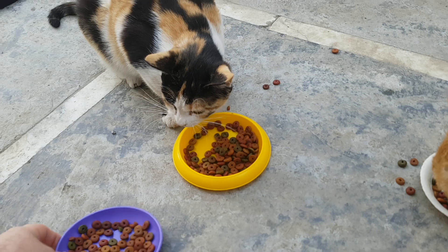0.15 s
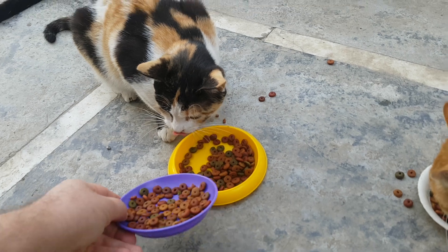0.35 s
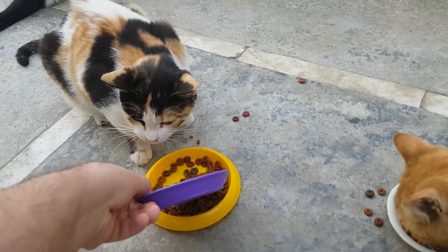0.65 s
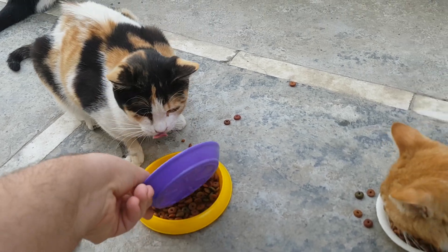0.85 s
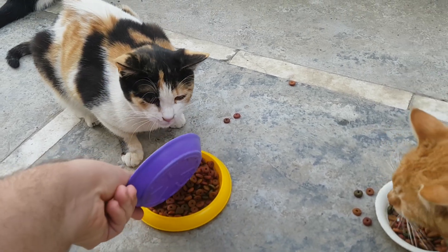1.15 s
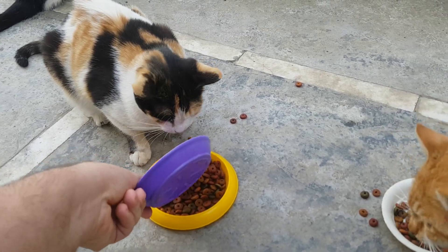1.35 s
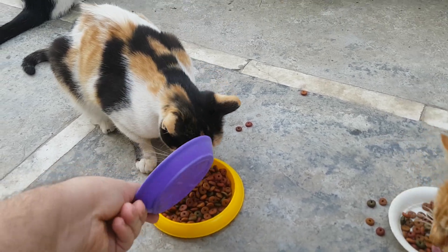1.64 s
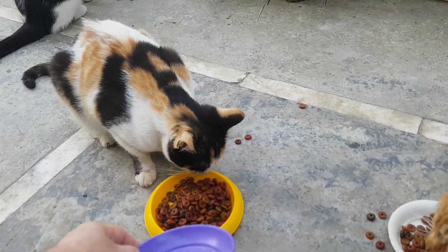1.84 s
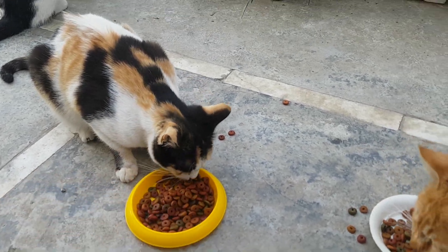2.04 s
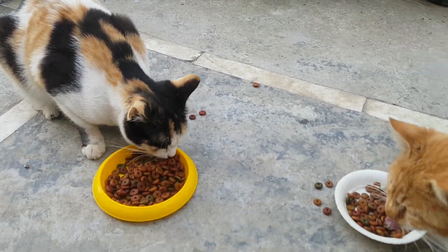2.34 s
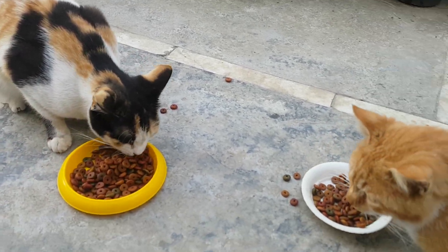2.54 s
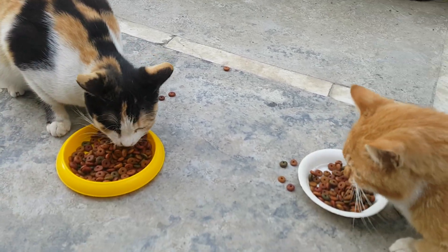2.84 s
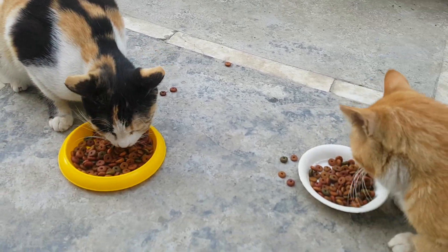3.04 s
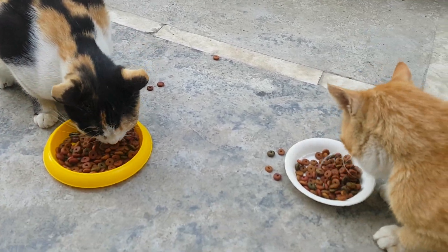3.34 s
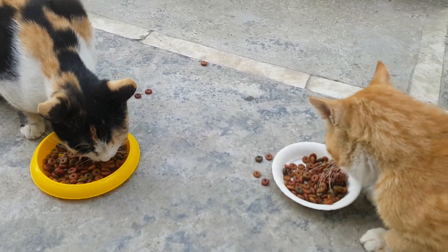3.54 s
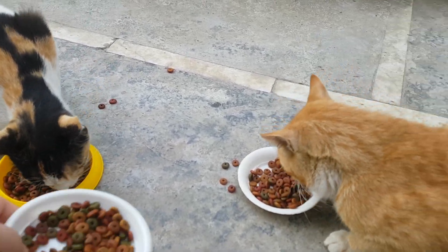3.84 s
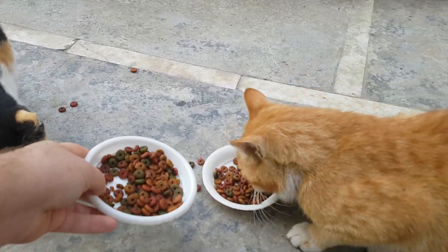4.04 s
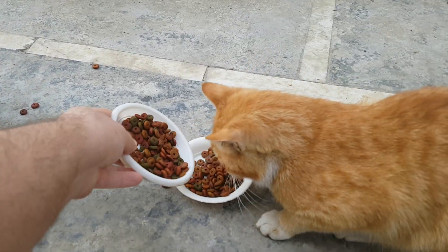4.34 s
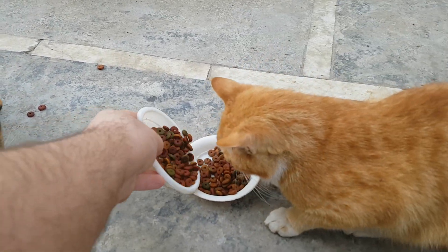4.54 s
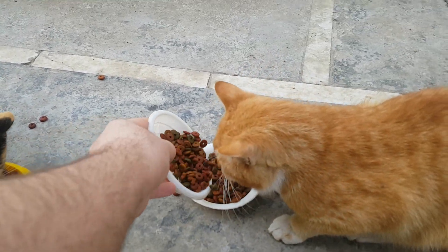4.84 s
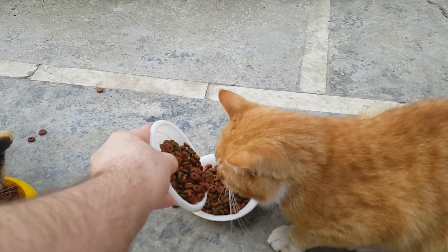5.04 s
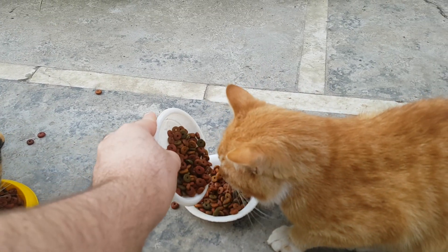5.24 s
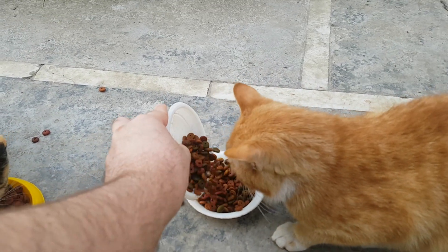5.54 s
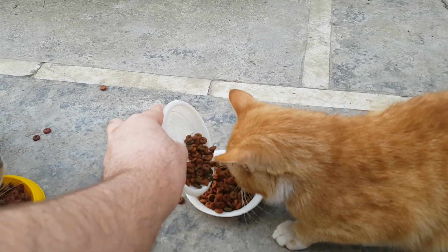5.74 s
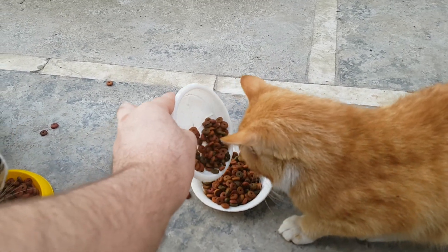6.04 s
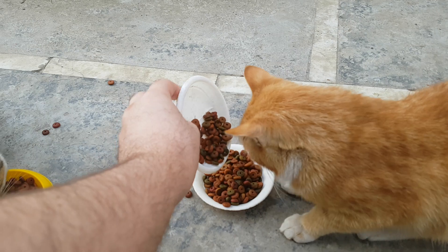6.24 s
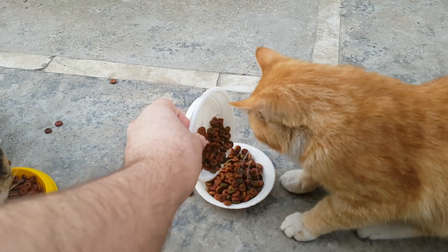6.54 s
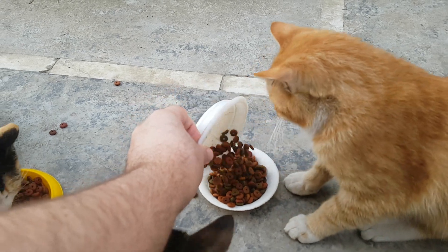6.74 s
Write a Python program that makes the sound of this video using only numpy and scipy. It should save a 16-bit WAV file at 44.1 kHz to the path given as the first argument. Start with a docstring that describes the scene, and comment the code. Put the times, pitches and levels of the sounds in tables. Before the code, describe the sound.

Dry pet food rattles into plastic bowls in two pours, with an empty bowl clattering on concrete and faint cat crunching between them.

```python
"""Dry pet food poured from hand-held plastic bowls into bowls on a concrete yard.
A distant drone and faint hum run throughout; at the start cloth rustles and a cat crunches.
First pour, to 1.4 s: the heap slides, pellets tick on each other and ring the plastic.
At 2.2-2.5 s the emptied bowl bounces on the concrete; then cats crunch and push pellets about.
Second pour, from 4 s: more slides, ticks and rustle; the held bowl bumps the one below."""
import sys
import numpy as np
from scipy import signal
from scipy.io import wavfile

SR = 44100
rng = np.random.default_rng(int(sys.argv[2]) if len(sys.argv) > 2 else 0)


def master_out(mix):
    """Clip the mix to full scale and print it as 16-bit PCM to the path in sys.argv[1]."""
    frames = np.transpose(np.atleast_2d(mix))
    ceiling = np.clip(frames, -1, 1)
    pcm = np.round(ceiling * 32767).astype(np.int16)
    wavfile.write(sys.argv[1], SR, pcm)


N = 303408
SPLIT_S = 2.55   # first pour's bowls before, second's after
FIRST_LEAN_DB, SECOND_LEAN_DB, SET_DOWN_LEAN_DB = 2, 3.5, 3.3   # nominal, right over left


def from_db(db):
    """dB to gain."""
    return 10 ** (np.asarray(db) / 20)


def rms_one(x):
    """Scale to rms 1."""
    return x / np.sqrt(np.mean(x ** 2) + 1e-20)


def in_time(rows):
    """Per-sample gain from (t/s, level/dB) rows."""
    s, db = np.transpose(rows)
    return from_db(np.interp(np.arange(N) / SR, s, db))


def at_hz(points, hz):
    """Look up (f/Hz, value) rows on a log axis."""
    knots_hz, values = np.transpose(points)
    return np.interp(np.log(hz), np.log(knots_hz + 1), values)


def butter(x, order, hz, kind):
    """Causal Butterworth filter."""
    return signal.sosfilt(signal.butter(order, hz, kind, fs=SR, output="sos"), x)


def ring(clicks, hz, t60_s):
    """Resonator: a unit click starts a decaying unit sine."""
    r, w = from_db(-60 / (t60_s * SR)), 2 * np.pi * hz / SR
    return signal.lfilter([0, np.sin(w)], [1, -2 * r * np.cos(w), r * r], clicks + 1e-18)


def drift(rate_hz):
    """Slow random wander, rms 1."""
    r = np.exp(-80 * np.pi * rate_hz / SR)
    slow = signal.lfilter([1], [1, -2 * r, r * r], rng.standard_normal(N // 40 + 2002))[2000:]
    return np.interp(np.arange(N) / 40, np.arange(len(slow)), rms_one(slow))


# left-right likeness of noise: f/Hz, correlation
CORRELATION = [(30, .65), (110, .75), (220, .75), (380, .55), (700, .07), (1290, -.3), (2400, .1),
               (15000, 0)]

def banded_noise(spectrum, flicker_db, correlation_scale):
    """Stereo noise in flickering half-octave bands, rms 1."""
    out, common = 0, drift(2.5)
    edges_hz = 22 * 2 ** np.arange(0, 9.9, .5)
    white = rng.standard_normal((2, 2, N))
    for k, (low, high) in enumerate(zip(edges_hz, edges_hz[1:])):
        if high < spectrum[0][0]:
            continue
        mid, side = butter(white[k % 2], 2, [low, high], "band")
        hz = np.sqrt(low * high)
        alike = np.clip(correlation_scale * at_hz(CORRELATION, hz), -1, 1)
        gain = from_db(at_hz(spectrum, hz) + flicker_db * (.6 * common + drift(12)))
        out = out + gain * (np.sqrt(1 + alike) * mid + np.sqrt(1 - alike) * side * [[1], [-1]])
    return rms_one(out)


# drone spectrum: f/Hz, relative density/dB
DRONE_SPECTRUM = [(12, -29), (20, -15), (49, -10), (104, -5.5), (222, -10.5), (347, -4), (527, -10),
                  (1030, -12), (1330, -15.5), (2200, -17), (3440, -29.5), (7110, -34), (9950, -34.5),
                  (14700, -35.5), (16000, -39)]
# drone envelope: t/s, level/dB
DRONE_LEVELS = [(0, -54), (.3, -55), (.7, -54.5), (1.3, -58), (2.2, -57.5), (3.2, -58.5), (4.2, -58),
                (5, -59), (6, -59.5), (6.88, -60)]

def drone():
    """Distant, low, near-steady noise."""
    return in_time(DRONE_LEVELS) * banded_noise(DRONE_SPECTRUM, flicker_db=.5, correlation_scale=1)


# hum tones: f/Hz, width/Hz, start level/dB, fade/(dB/s)
HUM_TONES = [(87, 14, -76.5, -0.2), (172.9, 5.6, -70.5, 0.85), (344.8, 9.2, -68, 0.1),
             (400.8, 61, -62, 2.5)]

def hum():
    """Narrow wavering tones: noise twice through a resonance."""
    out = 0
    for hz, width_hz, db, fade_db_per_s in HUM_TONES:
        r = np.exp(-np.pi * width_hz / SR)
        poles = [1, -2 * r * np.cos(2 * np.pi * hz / SR), r * r]
        band = signal.lfilter([1, 0, -1], poles, rng.standard_normal(N + SR))
        tone = signal.lfilter([1], poles, band)[SR:]
        out = out + from_db(db - fade_db_per_s * np.arange(N) / SR) * rms_one(tone)
    return out


def yard(x, level_db=-17, t60_s=.09, cutoff_hz=6000):
    """Scatter off ground and walls: a dull noise tail per channel."""
    t = np.arange(SR // 3) / SR
    tail = rng.standard_normal((2, len(t))) * from_db(-60 * t / t60_s) * (t > .002)
    tail = butter(tail, 1, cutoff_hz, "low")
    tail = from_db(level_db) * tail / np.sqrt(np.sum(tail ** 2, axis=1, keepdims=True))
    return signal.fftconvolve(x, tail, axes=1)[:, :N]


# cloth spectrum: f/Hz, relative density/dB
RUSTLE_SPECTRUM = [(700, -19), (1500, -1.5), (3000, -4.5), (5000, -15.5), (8000, -0.5), (9300, -12),
                   (12500, -8), (16000, -25)]
# cloth envelope: t/s, level/dB
RUSTLE_LEVELS = [(0, -52), (.25, -54), (.4, -66.5), (.52, -50.5), (.68, -57.5), (.8, -46), (.95, -96),
                 (1.6, -87), (2.05, -68.5), (2.62, -57.5), (2.72, -74.5), (3.7, -75), (3.85, -61),
                 (4.0, -53.5), (4.15, -59), (5.2, -75), (5.7, -64), (6.0, -98), (6.88, -54)]

def rustle():
    """Nearby cloth: swells of bright noise."""
    return in_time(RUSTLE_LEVELS) * banded_noise(RUSTLE_SPECTRUM, flicker_db=.7, correlation_scale=.3)


# crunch spectrum: f/Hz, relative density/dB
CRUNCH_SPECTRUM = [(900, -59), (2000, 3.5), (3000, -4.5), (5000, -12), (7500, -7), (9500, -16),
                   (13000, -15.5), (16000, -19)]
# cat bites: t/s, length/s, level/dB
BITES = [(0.046, 0.13, -43.5), (1.775, 0.038, -54), (2.997, 0.024, -56.5), (3.01, 0.1, -51.5),
         (3.132, 0.093, -65), (3.218, 0.084, -57), (6.245, 0.17, -68.5)]

def crunches():
    """Teeth crush a pellet: gritty noise under a short swell."""
    t, swell = np.arange(N) / SR, 0
    for start_s, length_s, db in BITES:
        progress = np.clip((t - start_s) / length_s, 0, 1)
        swell = swell + from_db(db) * np.sin(np.pi * progress ** .93).clip(0)
    grit = from_db(3.2 * drift(190))
    return swell * grit * banded_noise(CRUNCH_SPECTRUM, flicker_db=-.5, correlation_scale=.1)


# pushed pellets: t/s, length/s, f/Hz, level/dB
CAT_PUSHES = [(3.134, 0.066, 2750, -57), (3.197, .03, 2620, -61), (3.563, 0.05, 2700, -57.5),
              (3.8, 0.042, 2550, -44.5), (3.845, 0.018, 2490, -54), (5.039, 0.036, 2020, -49.5)]

def pushes(slips_per_s=1100, t60_s=.0051):
    """A cat pushes a pellet across its bowl: uneven slips ring one note."""
    t, out = np.arange(N) / SR, 0
    slips = rng.standard_normal(N) * (rng.random(N) < slips_per_s / SR)
    for start_s, length_s, hz, db in CAT_PUSHES:
        progress = np.clip((t - start_s) / length_s, 0, 1)
        swell = np.sin(np.pi * progress).clip(0) ** .5
        stutter = ring(ring(slips, hz, t60_s), hz, t60_s / 2)
        out = out + from_db(db) * swell * rms_one(stutter)
    return out * from_db(SECOND_LEAN_DB * np.array([[-.5], [.5]]))


MAX_T60_CYCLES = 62.4   # soft plastic damps every mode within this
LANDING_JITTER_S = .00004   # pellets land all over a bowl, so the right lag varies
# stereo balance of the bowls: f/Hz, lean multiplier
LEAN_SCALE = [(300, -0.48), (1300, 1.65), (2400, 2.43), (4500, 1.25), (8000, 1.28), (15000, -.2)]

def strikes(times_s, levels_db, modes, detune, lean_db, rise_s=.0004, jitter_s=0):
    """Struck plastic: three beating partials a mode, retuned per hit. levels_db: hits x modes."""
    left_at = np.round(times_s * SR).astype(int)
    hz, mode_db, t60_s = np.repeat(np.transpose(modes), 3, axis=1)
    t = np.arange(1300)[:, None] / SR
    scatter = rng.standard_normal((len(left_at), 3, len(hz)))
    pitches_hz = hz * np.exp(detune * scatter[:, 0])
    decay = from_db(-60 * t / np.minimum(t60_s, MAX_T60_CYCLES / hz))
    envelope = decay * (1 - np.exp(-t / rise_s))
    balance_db = lean_db * np.outer([-.5, .5], at_hz(LEAN_SCALE, hz)) + 1.5 * scatter[:, 1:]
    partial_db = np.repeat(levels_db, 3, axis=1) + mode_db - 9
    signs = (-1) ** (np.arange(len(hz)) // 3)
    gains = signs * from_db(partial_db[:, None] + balance_db)
    jitter = np.round(jitter_s * SR * rng.standard_normal(len(left_at))).astype(int)
    right_at = (left_at + jitter).clip(0, N)
    out = np.zeros((2, N + len(t)))
    for i, j, gain, pitch_hz in zip(left_at, right_at, gains, pitches_hz):
        left, right = gain @ (envelope * np.sin(2 * np.pi * pitch_hz * t)).T
        out[0, i:i + len(t)] += left
        out[1, j:j + len(t)] += right
    return out[:, :N]


def blows(hits, modes, body_hz, bright_hz, spread_db, **strike_args):
    """Hits ring a bowl; body shifts modes below body_hz, brightness those above bright_hz."""
    s, peak_db, body_db, bright_db = np.transpose(hits)[:, :, None]
    hz = np.array(modes)[:, 0]
    levels_db = peak_db + body_db * (hz < body_hz) + bright_db * (hz > bright_hz)
    levels_db += spread_db * rng.standard_normal(levels_db.shape)
    return strikes(s[:, 0], levels_db, modes, **strike_args)


def snaps(hits, gain_db, band_hz=(3430, 12000), t60_s=.018):
    """Dry contact crack: a treble noise burst, stronger for brighter hits."""
    s, peak_db, _, bright_db = np.transpose(hits)
    clicks = np.zeros(N)
    clicks[np.round(s * SR).astype(int)] = from_db(peak_db + bright_db + gain_db)
    envelope = signal.lfilter([1], [1, -from_db(-60 / (t60_s * SR))], clicks + 1e-18)
    noise = rng.standard_normal(N) + .8 * rng.standard_normal((2, N))
    return butter(envelope * noise, 1, band_hz, "band")


def lag_right(x, lag_s, bass_hz=1000, bass_share=.35):
    """The farther, right microphone lags; bass bends round its housing and lags less."""
    n, lag = np.arange(N), lag_s * SR
    bass = signal.sosfiltfilt(signal.butter(4, bass_hz, fs=SR, output="sos"), x[1])
    right = np.interp(n - bass_share * lag, n, bass) + np.interp(n - lag, n, x[1] - bass)
    return np.array([x[0], right])


# bowl-on-bowl knocks: t/s, level/dB
KNOCKS = [(5.203, -45), (6.791, -38), (6.801, -41)]
# hollow ring: f/Hz, level/dB, t60/s
HOLLOW_MODES = [(270, 2, 0.021), (606, 5.2, 0.0076), (1020, 2.2, 0.015)]

def bumps():
    """The held bowl knocks the one below: a low hollow ring."""
    s, peak_db = np.transpose(KNOCKS)
    levels_db = peak_db[:, None] + np.zeros(len(HOLLOW_MODES))
    return strikes(s, levels_db, HOLLOW_MODES, detune=.039, lean_db=SECOND_LEAN_DB, rise_s=.00036)


# bowl on concrete: t/s, level/dB, body/dB, brightness/dB
BOUNCES = [(2.2250, -31, 8.5, -10), (2.2455, -52, 13, -21), (2.268, -49, 0, -16), (2.28, -54.5, 10, -16),
           (2.3857, -15.5, -4, -0.5), (2.418, -43, 2, -10), (2.4510, -21.5, -3.5, -0.5),
           (2.4720, -49, 10, -14), (2.4835, -39, 5, -2.5), (2.4940, -54, -6, -17), (2.5010, -47.5, 7, -13)]
# empty bowl: f/Hz, level/dB, t60/s
EMPTY_MODES = [(400, -11.5, 0.015), (737, -2.5, 0.045), (970, -1.5, 0.016), (1326, 1.5, 0.019),
               (1530, 2.5, 0.011), (1973, 8, 0.012), (2404, 5, 0.011), (2750, -2.5, 0.008),
               (3040, -15.5, 0.015), (4036, 12, .011), (5470, 2.5, 0.0057), (6420, -10.5, 0.0075),
               (7700, -0.5, .007)]

def set_down():
    """The emptied bowl bounces on concrete, ringing and cracking."""
    rings = blows(BOUNCES, EMPTY_MODES, body_hz=1750, bright_hz=2800, spread_db=.5,
                  detune=.008, lean_db=SET_DOWN_LEAN_DB)
    return rings + snaps(BOUNCES, gain_db=-1.5)


# slides of the heap: t/s, length/s, level/dB, body/dB
HEAP_SLIDES = [(0.0, 0.14, -55, -15), (0.416, .1, -59, 16), (0.56, 0.34, -47, 9.5),
               (0.759, 0.058, -32.5, -1), (0.862, 0.049, -42.5, -13), (1.034, 0.04, -54.5, 4.5),
               (1.142, .11, -52.5, 5), (2.393, 0.13, -52.5, 13.2), (3.964, 0.18, -58, 8),
               (4.21, 0.23, -62, 16.5), (4.456, 0.19, -54, 11.5), (4.61, 0.1, -51, 2),
               (4.8, 0.083, -58, 13.5), (4.933, 0.065, -50.5, 1), (5.106, 0.39, -63.5, 8),
               (5.453, .1, -48.5, 4.3), (5.603, 0.26, -44, 1.2), (5.896, 0.054, -68, 2.5),
               (6.108, 0.085, -67.5, 6), (6.678, 0.053, -49, -3), (6.797, 0.092, -43, 2)]

def slide_gains(rise_db_per_s=358.5, sag_db_per_s=35, stop_db_per_s=217):
    """A tilt or jolt starts a slide, which sags and stops. Returns treble and body gains."""
    t, gains = np.arange(N) / SR, from_db(-110)
    for start_s, length_s, db, body_db in HEAP_SLIDES:
        age_s = t - start_s
        loss_db = rise_db_per_s * (-age_s).clip(0) + sag_db_per_s * age_s.clip(0)
        loss_db += stop_db_per_s * (age_s - length_s).clip(0)
        gains = gains + from_db(db - loss_db) * from_db([[0], [body_db]])
    return gains


# bowls of the first pour: f/Hz, level/dB, t60/s
FIRST_MODES = [(747, -23.5, 0.0105), (932, -16.5, 0.0099), (1470, 3, 0.0132), (1749, 0.5, 0.031),
               (2220, -3, 0.013), (2700, 1.5, 0.01234), (3310, -4, 0.028), (4364, -0.5, 0.012),
               (5540, -4, 0.0088), (6160, 4.5, 0.0095), (7830, 10.5, .006)]
# bowls of the second pour: f/Hz, level/dB, t60/s
SECOND_MODES = [(770, -17.5, 0.0091), (1060, -15, 0.03), (1763, 5.5, 0.0084), (2365, -2.5, 0.019),
                (3013, 5.5, .018), (3460, -16.5, 0.01), (4130, 3, 0.022), (5750, 9.5, .008),
                (6800, 6, 0.015), (7820, 7.5, .006)]

def sliding_heap(treble_gain, body_gain, ticks_per_s=2500, size_spread_db=3.5, body_hz=(620, 1970)):
    """Dense clumps of ticks; each rings about half the modes, at one of three tunings."""
    sizes = from_db(size_spread_db * np.minimum(rng.exponential(1, N), 3))
    ticks = sizes * (rng.random(N) < ticks_per_s * from_db(4 * drift(30)) / SR)
    split, pours = round(SPLIT_S * SR), []
    for modes, part, lean_db in ((FIRST_MODES, ticks[:split], FIRST_LEAN_DB),
                                 (SECOND_MODES, ticks[split:], SECOND_LEAN_DB)):
        bowl = 0
        for hz, db, t60_s in modes:
            slot = rng.integers(0, 6, len(part))
            t60_s = min(t60_s, MAX_T60_CYCLES / hz)
            tone = sum(ring(part * (slot == k), hz * tuning, t60_s) * (-1) ** k
                       for k, tuning in enumerate([.93, 1, 1.07]))
            right = np.roll(tone, round(LANDING_JITTER_S * SR * rng.standard_normal()))
            dull_db = -9 * (hz > 5300)   # small soft contacts are duller
            balance_db = lean_db * at_hz(LEAN_SCALE, hz) * np.array([[-.5], [.5]])
            bowl = bowl + np.array([tone, right]) * from_db(db + dull_db + balance_db)
        pours.append(rms_one(bowl))
    rattle = np.hstack(pours)
    body = butter(rattle, 3, body_hz, "band")
    treble = butter(rattle, 3, body_hz[1], "high")
    return body_gain * body + treble_gain * treble


def strays(heap_gain, per_s=70, over_heap_db=5.5, body_db=1.8, bright_db=-11):
    """Pellets leave the heap and tick alone: random hit rows that follow its level."""
    at = rng.integers(0, N, round(per_s * N / SR))
    scatter = rng.standard_normal((len(at), 3))
    peak_db = 20 * np.log10(heap_gain[at]) + over_heap_db + 3 * scatter[:, 0]
    colour_db = [body_db, bright_db] + 2.5 * scatter[:, 1:]
    return np.column_stack([at / SR, peak_db, colour_db])


# single pellets on plastic: t/s, level/dB, body/dB, brightness/dB
PELLET_HITS = [(0.1228, -33, 1, -18), (0.134, -49, -14, -5), (0.1452, -46, -9, 10), (0.2927, -50, 7.5, 3),
               (0.4342, -60, 8, 20), (0.4532, -39.5, 4, 0.5), (0.549, -35, 2, -3), (0.5618, -47, 6, 7),
               (0.5975, -52.5, -5, 13), (0.6596, -44.5, 4, 7), (0.6936, -27, 11.5, -29),
               (0.6999, -14.5, -2, -8.5), (0.7273, -44, 6, -6), (0.7708, -27, -0.5, -20),
               (0.7829, -17, 0, -12), (0.8055, -25, -14, -11), (0.8915, -31, -6, -18),
               (0.8989, -35, -16, -20), (0.9082, -24.5, -25, -18), (0.9286, -26, -4, -17),
               (0.9485, -37, -20, -28), (0.9867, -41, 7.5, -22), (1.0028, -50, 15, -21),
               (1.0206, -48.5, 10.5, -20), (1.0567, -44, 4, 15), (1.0715, -29, -9, -14),
               (1.0942, -22, -9, -16), (1.1008, -48, -20, -23), (1.1519, -44.5, 12.5, -15),
               (1.1626, -37.5, 10, -24), (1.1684, -33, -4, -21), (1.1849, -28, -2, -5),
               (1.2182, -40.5, 8.5, -29), (1.2383, -33, -17, -20), (1.249, -42, 11.5, -27),
               (1.3213, -40.5, 2.5, -16), (1.374, -48.5, -1, -16), (1.7942, -52, 10, 0),
               (2.1415, -49, 10.5, -20), (3.0403, -44, -3, -13), (3.3667, -57.5, 17, 2),
               (3.7009, -33.5, -4, -5), (3.799, -51, -5, -3), (3.8294, -50, -13, 1), (4.2317, -61, 22, -17),
               (4.4928, -48, 17, 1), (4.5477, -40, 3, -21), (4.561, -33, -1, -4), (4.5868, -32, -14, -25),
               (4.6, -26, -25, -5), (4.6086, -29, -15, -2.5), (4.63, -21.5, 0, -15), (4.6613, -30, 3.5, -5),
               (4.6652, -27, 0, -3), (4.7042, -37, 3.5, -10), (4.7522, -47, 13, -15),
               (4.8198, -36, -5, -10), (4.8255, -40, 5, -8), (4.8482, -33.5, -2, 3.5),
               (4.895, -33.5, -11, -14), (4.9412, -31.5, 3, -14), (4.95, -32, 5, -6),
               (4.9656, -34, 7.5, -9), (5.0047, -33, 0, -18), (5.0645, -42, -5, -15),
               (5.0765, -36, 2.5, -11), (5.1028, -36, 0, -11.5), (5.117, -39.5, 2, -13),
               (5.186, -44.5, 7, -22), (5.205, -40, 7.5, 5.5), (5.247, -35.5, 0.5, -8),
               (5.3007, -48, 6, -29), (5.339, -50.5, 4, -21), (5.4313, -33, -5.5, -9.5),
               (5.455, -46, -21, -18), (5.4982, -36.5, 1, -10), (5.5254, -27, 3, -5),
               (5.5423, -27.5, -10, -11), (5.5857, -30, -17, -14), (5.5949, -19, -9, -7),
               (5.6136, -32, -24, -26), (5.6503, -33, -9, -6), (5.6675, -43, -1, -24),
               (5.6824, -34.5, 8, -5), (5.6904, -40, 7, -12), (5.7146, -34.5, -16, -5),
               (5.7269, -34, 5, -10), (5.7629, -36.5, -2, -7), (5.7773, -36, 8, -20),
               (5.8017, -32.5, -7, -5.5), (5.816, -37.5, -1, -26), (5.8546, -30.5, -5.5, -10),
               (5.884, -43, -7, -12), (5.8954, -52, -7.5, -15), (5.9211, -37.5, -2, -15),
               (5.9385, -42.5, -3, -9), (5.961, -39.5, -6, -14), (6.0447, -47, 5, -12),
               (6.1136, -51.5, -9, -28), (6.5637, -31, -3, -7), (6.6134, -45, -4, -14),
               (6.6694, -34.5, -31, 4), (6.6849, -51, -18, 4), (6.7216, -44, -6, -12),
               (6.7418, -28, -6, -5.5), (6.8215, -29, -34, 2), (6.8635, -32, -24, -2.5)]

def pellets(stray_hits):
    """Each pellet cracks on the plastic and rings the bowls in use."""
    hits = np.vstack([PELLET_HITS, stray_hits])
    early = hits[:, 0] < SPLIT_S
    landing = dict(body_hz=2300, spread_db=1.5, detune=.08, jitter_s=LANDING_JITTER_S)
    first = blows(hits[early], FIRST_MODES, bright_hz=4900, lean_db=FIRST_LEAN_DB, **landing)
    second = blows(hits[~early], SECOND_MODES, bright_hz=4700, lean_db=SECOND_LEAN_DB, **landing)
    return first + second + snaps(hits, gain_db=-6.5)


def scene():
    """Bowls and yard scatter over crunches, cloth, drone and hum."""
    treble_gain, body_gain = slide_gains()
    pours = pellets(strays(treble_gain)) + sliding_heap(treble_gain, body_gain) + bumps() + pushes()
    pour_lag_s = np.where(np.arange(N) < SPLIT_S * SR, .00030, .00023)
    bowls = lag_right(pours, pour_lag_s) + lag_right(set_down(), lag_s=.00039)
    bowls = butter(bowls, 2, 280, "high")   # small bowls radiate no bass
    cloth, distant = rustle(), drone()
    near = bowls + yard(bowls) + crunches() + cloth
    return near + (distant + hum()) * from_db([[-.8], [.8]])


def record(dry, dip_hz=9400, dip_width_hz=2300, dip_depth=.54, ceiling=.95, cutoff_hz=16500):
    """Microphone: one weak treble band, rounded peaks, low-pass."""
    band = signal.lfilter(*signal.iirpeak(dip_hz, dip_hz / dip_width_hz, fs=SR), dry)
    rounded = ceiling * np.tanh((dry - dip_depth * band) / ceiling)
    return signal.sosfilt(signal.cheby2(12, 60, cutoff_hz, fs=SR, output="sos"), rounded)


dry = scene()
out = record(dry)
master_out(out)
```